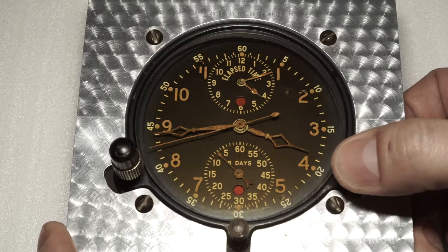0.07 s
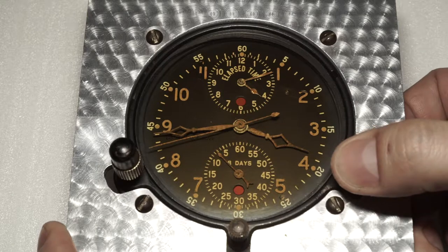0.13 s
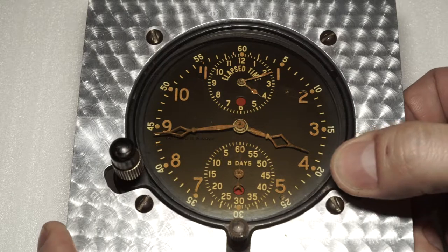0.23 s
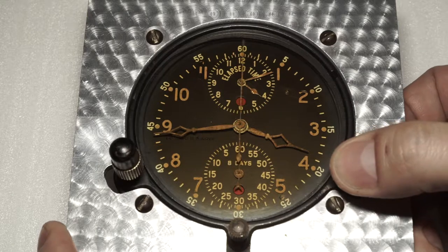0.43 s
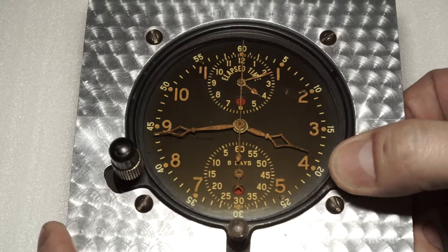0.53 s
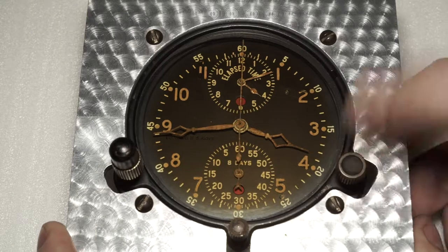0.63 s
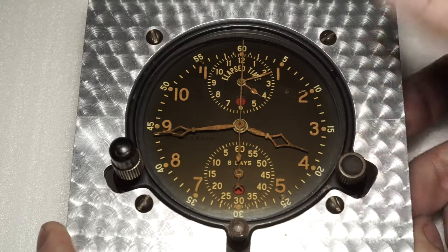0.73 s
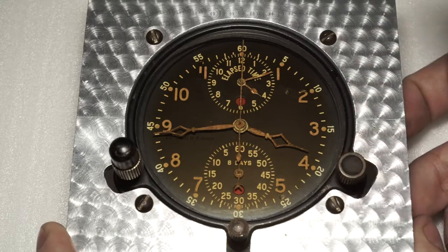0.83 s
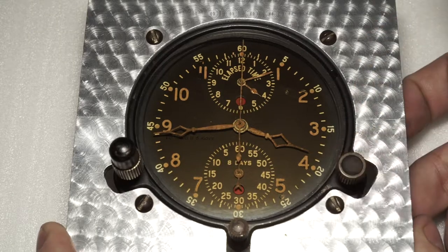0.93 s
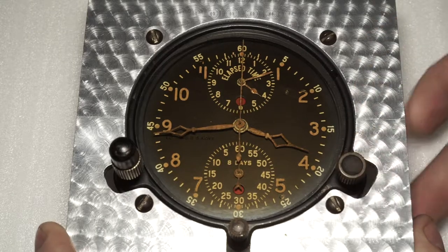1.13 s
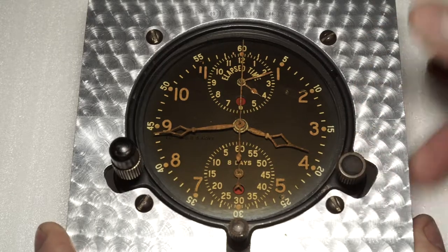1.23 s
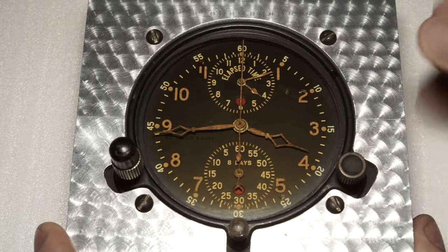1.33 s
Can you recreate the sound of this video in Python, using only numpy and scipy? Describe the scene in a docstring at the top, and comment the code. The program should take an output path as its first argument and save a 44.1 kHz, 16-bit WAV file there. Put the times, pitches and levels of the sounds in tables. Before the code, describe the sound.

A sharp click and a duller one from an old clock's button, over faint hiss.

```python
"""Hum and hiss fill a small room. Close by, a thumb presses the push button of an old panel clock:
the lever trips and snaps home, each impact cracking and ringing the modes of the case and works,
which rattle faintly as they settle. The button springs back with a softer, duller click.
Last, the hand slides away, and the friction of the skin makes a soft brush."""
import sys
import numpy as np
from scipy import signal
from scipy.fft import rfft, irfft, next_fast_len
from scipy.io import wavfile
from scipy.ndimage import map_coordinates

SR = 44100
rng = np.random.default_rng(int(sys.argv[2]) if len(sys.argv) > 2 else 0)


def log_audio(samples):
    """Write samples as a 16-bit WAV file to the path given in sys.argv[1]."""
    # one column per channel
    frames = np.atleast_2d(samples).T
    # limit to full scale, then quantise
    limited = np.clip(frames, -1, 1)
    pcm = np.round(limited * 32767).astype(np.int16)
    wavfile.write(sys.argv[1], SR, pcm)


N = 61739
TOP_HZ = 11080  # upper band limit

# normal modes of the case and works (f/Hz, t60/s, level on press/dB, level on release/dB)
CLOCK_MODES = [(189, 0.041, -39, -66), (235, 0.12, -42, -82), (502, 0.039, -35, -51),
               (671, 0.045, -61, -37), (1090, 0.0045, -28, -45), (1168, 0.026, -28, -37),
               (1345, 0.013, -15.5, -34), (1443, 0.011, -21.5, -31), (1900, 0.026, -44, -41),
               (2670, 0.019, -32, -36.5), (3110, 0.058, -39.5, -44), (3754, 0.033, -37, -58),
               (4375, 0.034, -36, -55), (5068, 0.025, -29, -33), (5210, 0.063, -34.5, -44.5),
               (5850, 0.017, -30, -63), (7570, .02, -40, -36.5), (8980, 0.018, -27.5, -48)]
# left-right coherence of the room's diffuse field (f/Hz, coherence)
ROOM_COHERENCE = [(100, .99), (500, 0.87), (1400, 0.64), (4000, .1), (11000, 0.055)]


def amp(db):
    """Amplitude ratio of a level: a factor of ten per 20 dB."""
    return 10 ** (np.asarray(db) / 20)


def unit(x):
    """Normalisation to an rms of 1."""
    return x / np.sqrt(np.mean(x ** 2) + 1e-20)


def along(points, hz):
    """Interpolation of (f/Hz, value) points on a logarithmic frequency axis."""
    freqs, values = np.transpose(points)
    return np.interp(np.log(hz + 1), np.log(freqs + 1), values)


def wobble(rate):
    """Smooth random modulation: a spline through `rate` Gaussian knots a second."""
    return map_coordinates(rng.standard_normal(256), [np.arange(N) * rate / SR], mode="wrap")


def filtered(x, response):
    """Linear filtering: the spectrum is multiplied by a frequency response."""
    size = next_fast_len(N + SR // 2)
    return irfft(rfft(x, size) * response(np.fft.rfftfreq(size, 1 / SR)), size)[..., :N]


def delayed(x, seconds):
    """Pure time delay of a stereo signal."""
    return np.pad(x, [(0, 0), (max(round(seconds * SR), 0), 0)])[:, :N]


def pan(db):
    """Interchannel level difference: left and right gains, positive to the left."""
    return amp([[db], [-db]])


def noise(colour, coherence):
    """Coloured stereo noise of rms 1; the balance of mid and side sets its coherence."""
    def response(hz):
        angle = np.arccos(np.clip(along(coherence, hz), -1, 1)) / 2
        return amp(along(colour, hz)) * (hz < TOP_HZ) * np.array([np.cos(angle), np.sin(angle)])
    mid, side = filtered(rng.standard_normal((2, N)), response)
    return unit(np.array([mid + side, mid - side]))


def room_tone(air_db=-57, waver_db=2, drift_rad=1.0):
    """Broadband rumble and hiss under a faint hum that wavers by amplitude and phase modulation."""
    # spectrum of the background noise (f/Hz, relative level/dB)
    air_colour = [(12, -30), (20, 2), (71, -11), (108, -0.5), (174, -8), (204, -1), (266, -6.5), (303, -7),
                  (619, -15), (896, -13.5), (1980, -20.5), (2570, -20.5), (3270, -23.5), (3730, -24),
                  (11000, -29), (14300, -97), (22000, -120)]
    # its left-right coherence (f/Hz, coherence)
    air_coherence = [(60, .98), (200, 0.98), (500, 0.63), (1400, 0.25), (4000, 0.11), (11000, 0.23)]
    # partials of the hum (f/Hz, rms level/dB)
    partials = [(201, -69.5), (699, -75)]
    t = np.arange(N) / SR
    hum = sum(amp(db + waver_db * wobble(5.4)) * np.sin(2 * np.pi * hz * t + drift_rad * wobble(9.3))
              for hz, db in partials)
    return amp(air_db) * noise(air_colour, air_coherence) + np.sqrt(2) * hum


def sliding_hand(rough_db=1, rough_rate=70, pan_db=-1.3):
    """Friction noise: skin brushes along the mounting plate, swelling and fading."""
    # envelope of the slide (t/s, level/dB)
    slide = [(.93, -77.5), (1.04, -64.5), (1.15, -56), (1.25, -54), (1.33, -57.5), (1.371, -66.5),
             (1.4, -72)]
    # spectrum of rubbing skin (f/Hz, relative level/dB)
    skin_colour = [(100, -41), (400, -24), (1200, -15), (2400, -6.5), (3700, -1), (6500, -1.5), (8700, 0.5),
                   (11000, -4)]
    level_db = np.interp(np.arange(N) / SR, *np.transpose(slide)) + rough_db * wobble(rough_rate)
    return pan(pan_db) * amp(level_db) * noise(skin_colour, ROOM_COHERENCE)


def settling_works(rise_s=0.0022):
    """Damped vibration: the works rattle faintly after the hands have flown back to zero."""
    # decaying noise bursts of the rattle (t/s, level/dB, t60/s)
    rattles = [(.262, -41.5, .12), (.297, -48, 0.25)]
    # their spectrum (f/Hz, relative level/dB)
    colour = [(100, 2), (1200, -10.5), (2300, -10), (2900, 6.5), (3500, 2), (4000, -12), (5200, 0.5),
              (7000, -7), (11000, -25)]
    t = np.arange(N) / SR
    swell = 1 - np.exp(-t / rise_s)
    return sum(delayed(noise(colour, ROOM_COHERENCE) * swell * amp(db - 60 * t / t60), start)
               for start, db, t60 in rattles)


def in_room(direct, pan_db=-0.5, reverb_db=-6):
    """Reverberation: direct sound, early reflections, then an exponentially decaying diffuse tail."""
    # reflections off near surfaces (delay/s, left level/dB, right level/dB)
    reflections = [(.0032, -17, -12.5), (.0075, -26, -44), (.0094, -18.5, -14)]
    # reverberation time (f/Hz, t60/s)
    decay_times = [(100, 0.57), (300, 0.17), (1200, 0.22), (3000, 0.21), (6000, 0.26), (11000, 0.3)]
    # spectrum at the start of the tail (f/Hz, relative level/dB)
    colour = [(80, -11.5), (250, 4), (700, 5.5), (1300, -9.5), (2000, 1.5), (3100, 2.5), (5000, -5.5),
              (7000, -1.5), (9000, -0.5), (11000, 0.5)]
    hz, t, spectra = signal.stft(noise(colour, ROOM_COHERENCE), SR, nperseg=256)
    decay = amp(-60 * t / along(decay_times, hz)[:, None])
    _, tail = signal.istft(spectra * decay, SR, nperseg=256)
    diffuse = signal.fftconvolve(direct, tail / np.linalg.norm(tail), axes=1)[:, :N]
    early = sum(amp([[left_db], [right_db]]) * delayed(direct, lag)
                for lag, left_db, right_db in reflections)
    return pan(pan_db) * direct + early + amp(reverb_db) * diffuse


def crack(colour, t60, rise_s=0.00046):
    """Contact noise: a brief broadband transient, coloured by a causal, minimum-phase filter."""
    # left-right coherence of the contact noise (f/Hz, coherence)
    coherence = [(300, .99), (1500, 0.91), (4000, 0.56), (11000, 0.48)]
    size = 4096
    t = np.arange(size) / SR
    gain = unit(amp(along(colour, np.fft.rfftfreq(size, 1 / SR))))
    cepstrum = irfft(np.log(gain))
    cepstrum[1:size // 2] *= 2  # folded onto positive time, so nothing rings before the contact
    cepstrum[size // 2 + 1:] = 0
    envelope = amp(-60 * t / t60) * (1 - np.exp(-t / rise_s))
    spatter = noise([(TOP_HZ, 0)], coherence)[:, :size] * envelope
    spatter = unit(spatter) * np.sqrt(np.mean(envelope ** 2))
    coloured = irfft(rfft(spatter) * np.exp(rfft(cepstrum)))
    return np.pad(coloured, [(0, 0), (0, N - size)])


def click(contacts, mode_levels, colour, rise_s=0.00048):
    """Impact excitation: each metal contact cracks and rings the case as a sum of damped modes."""
    t = np.arange(N) / SR
    ring = sum(amp(db - 60 * t / t60) * np.sin(2 * np.pi * hz * t)
               for (hz, t60, _, _), db in zip(CLOCK_MODES, mode_levels))
    ring *= np.expm1(-t / rise_s)
    return sum(delayed(amp(ring_db) * ring + amp(crack_db) * crack(colour, t60), start)
               for start, ring_db, crack_db, t60 in contacts)


def button():
    """The point of impact weights the modes: press and release strike the clock in different places."""
    # contacts (t/s, ring gain/dB, crack level/dB, crack t60/s)
    lever_trip = [(.2279, -27, -24, 0.012)]
    lever_snap = [(.2299, 2.5, -14.5, 0.0061)]
    spring_back = [(.6328, 0, -24.5, 0.0081), (.6369, -36, -38, 0.014)]
    # spectra of their cracks (f/Hz, relative level/dB)
    trip_colour = [(100, -24), (700, -12), (1100, 9), (2000, 6), (3000, 5), (4500, 10), (6000, 6),
                   (7500, -17), (8700, 15), (10000, -20), (11000, -48)]
    snap_colour = [(20, -20), (80, -19.5), (200, 5), (400, -10), (750, -7.5), (1300, 1), (2200, -3.5),
                   (4000, -2.5), (6000, 3.5), (7000, -9.5), (8900, 6), (9900, -3.5), (11000, -7.5)]
    spring_colour = [(20, -36), (80, -2), (270, -6.5), (700, 4.5), (1600, 4.5), (2900, 5), (4100, -7.5),
                     (5500, -0.5), (7700, -3.5), (9000, -13), (11000, -10.5)]
    _, _, press_db, release_db = np.transpose(CLOCK_MODES)
    press = in_room(click(lever_trip, press_db, trip_colour) + click(lever_snap, press_db, snap_colour))
    release = in_room(click(spring_back, release_db, spring_colour))
    return press + release


def scene():
    """Superposition: the pressures of button, works, hand and room add."""
    return button() + settling_works() + sliding_hand() + room_tone()


def record(dry):
    """Band limiting: a steep low-pass removes the treble above TOP_HZ."""
    return filtered(dry, lambda hz: 1 / np.sqrt(1 + (hz / TOP_HZ) ** 160))


dry = scene()
out = record(dry)
log_audio(out)
```